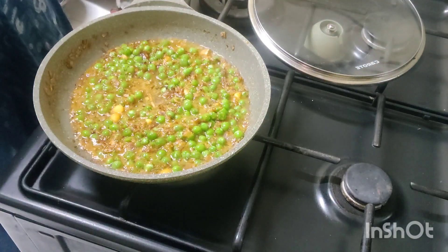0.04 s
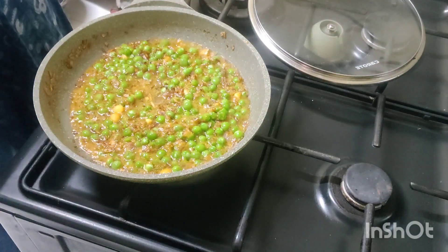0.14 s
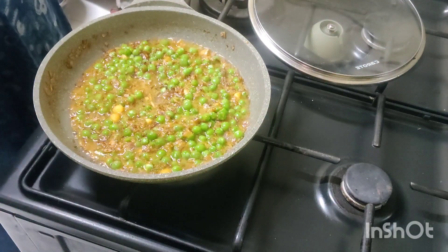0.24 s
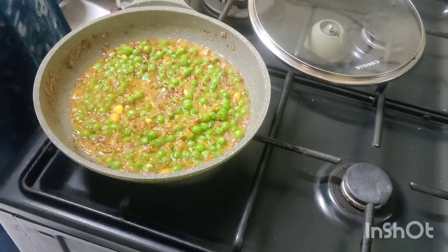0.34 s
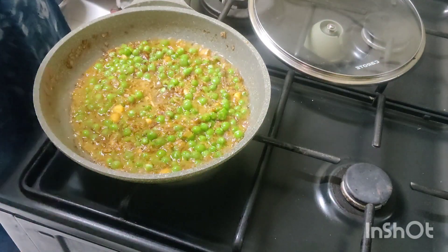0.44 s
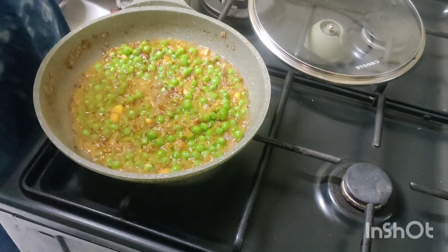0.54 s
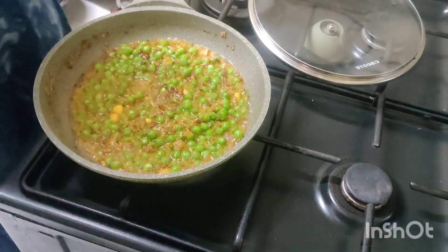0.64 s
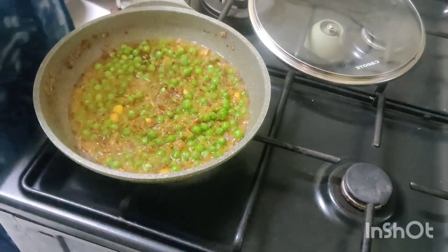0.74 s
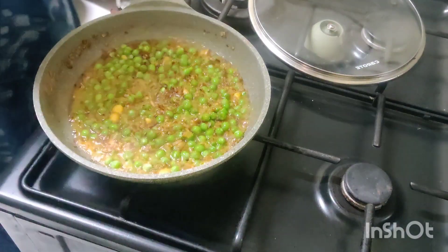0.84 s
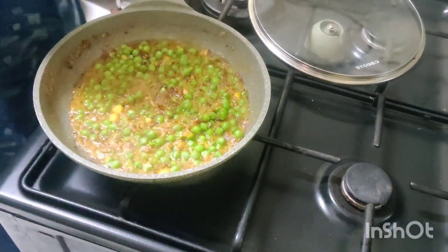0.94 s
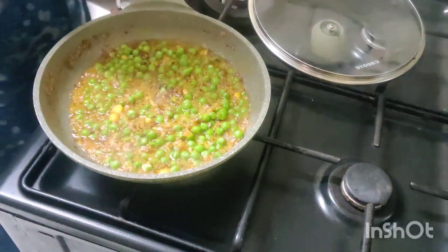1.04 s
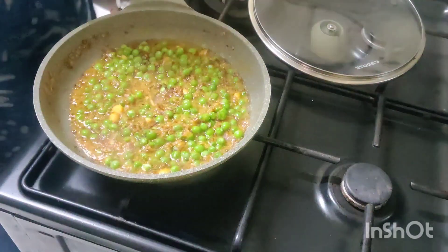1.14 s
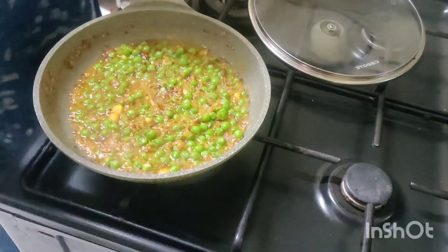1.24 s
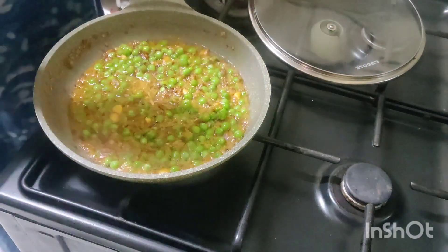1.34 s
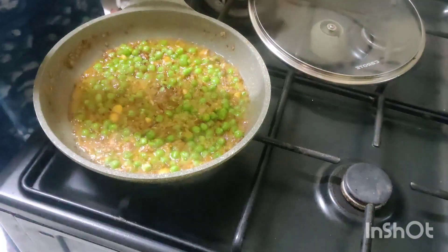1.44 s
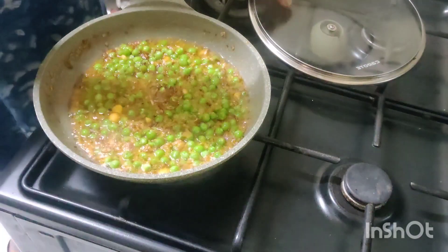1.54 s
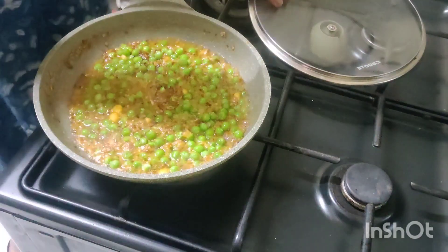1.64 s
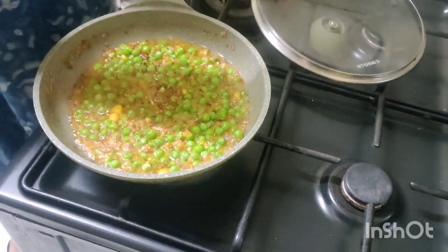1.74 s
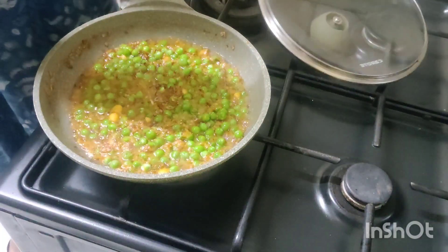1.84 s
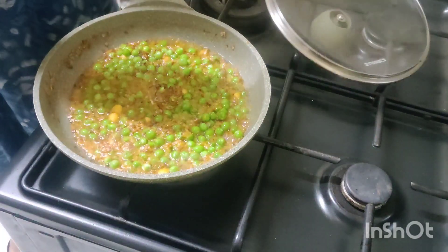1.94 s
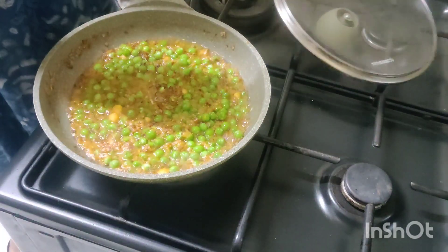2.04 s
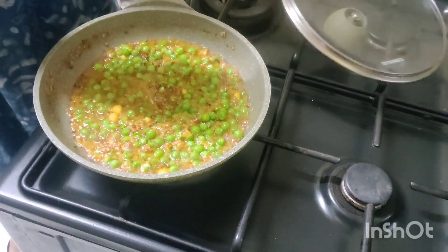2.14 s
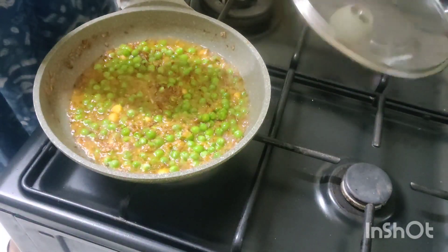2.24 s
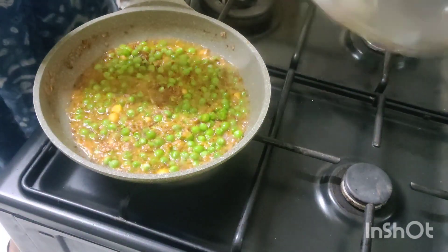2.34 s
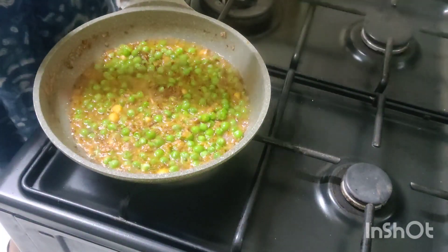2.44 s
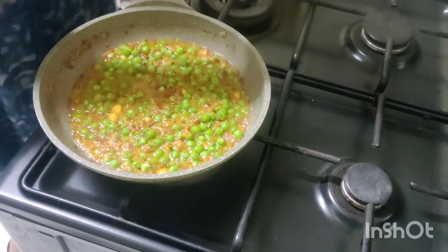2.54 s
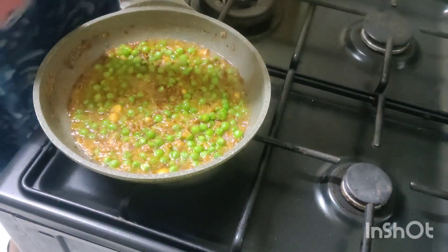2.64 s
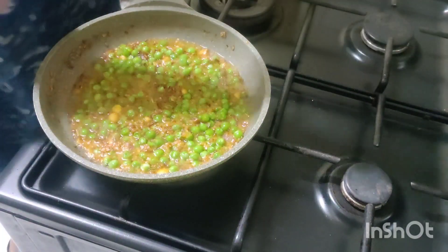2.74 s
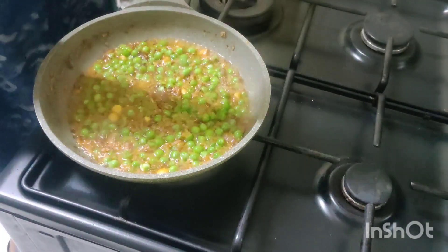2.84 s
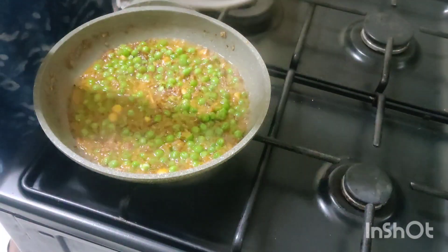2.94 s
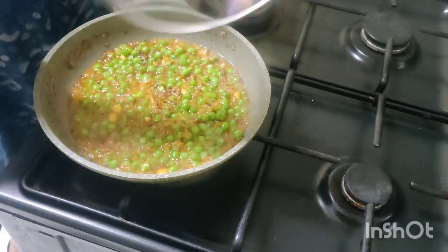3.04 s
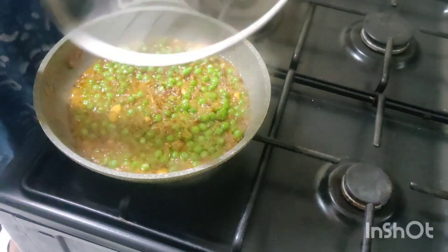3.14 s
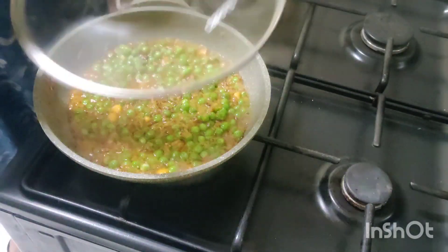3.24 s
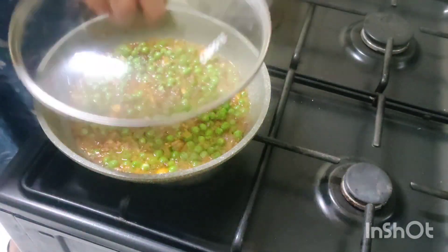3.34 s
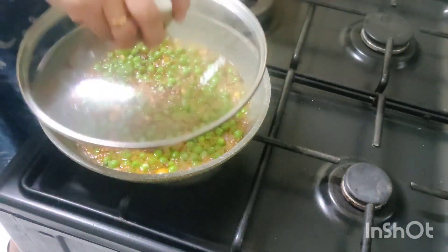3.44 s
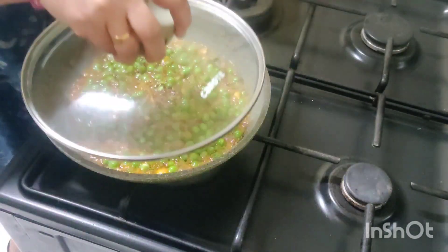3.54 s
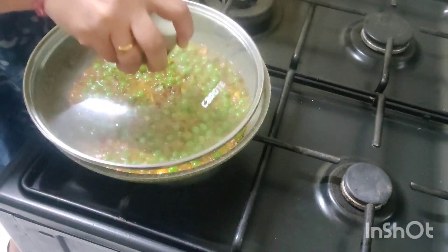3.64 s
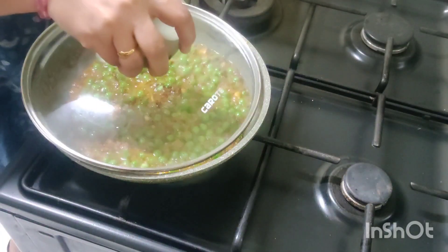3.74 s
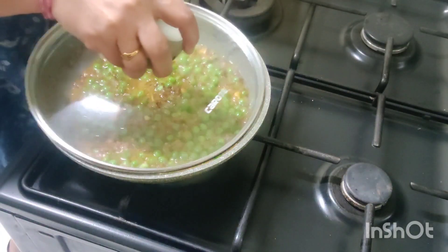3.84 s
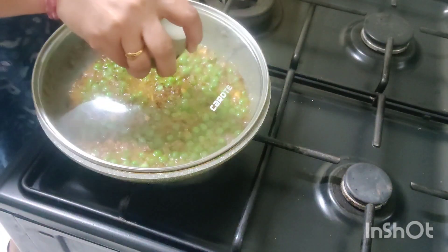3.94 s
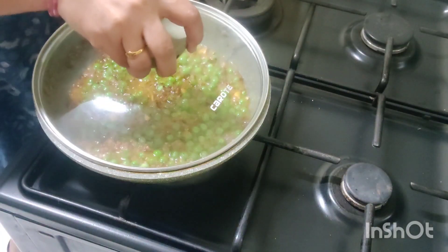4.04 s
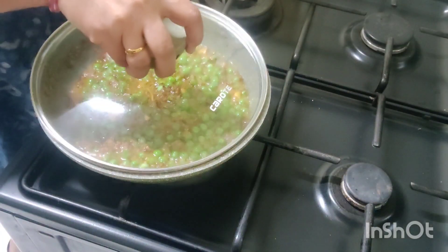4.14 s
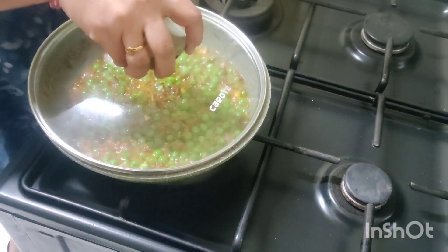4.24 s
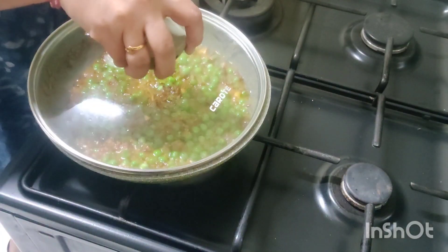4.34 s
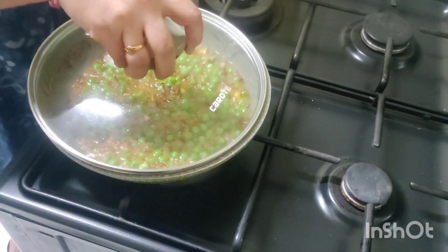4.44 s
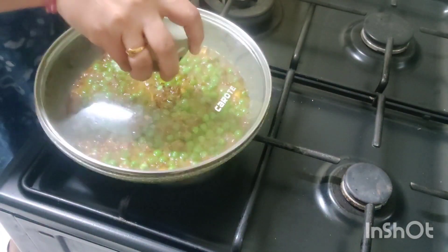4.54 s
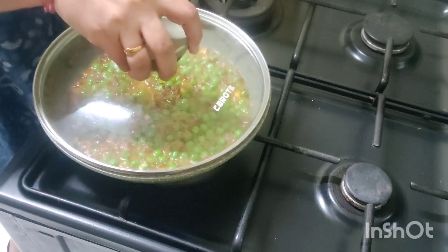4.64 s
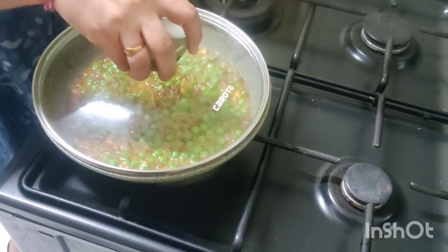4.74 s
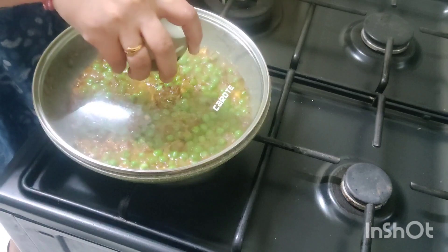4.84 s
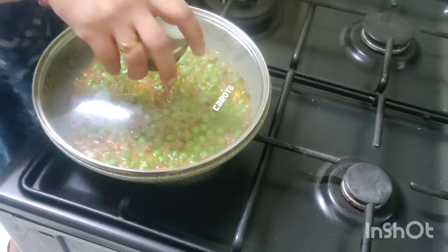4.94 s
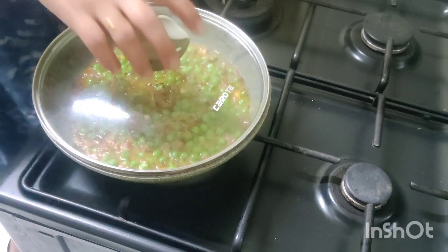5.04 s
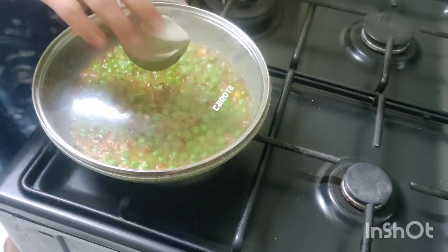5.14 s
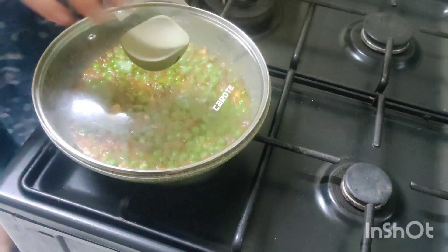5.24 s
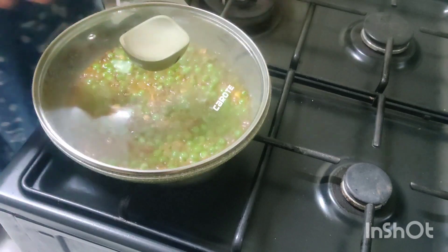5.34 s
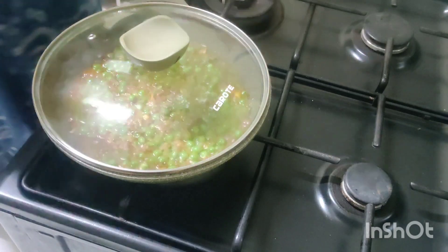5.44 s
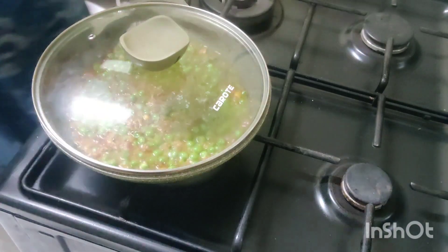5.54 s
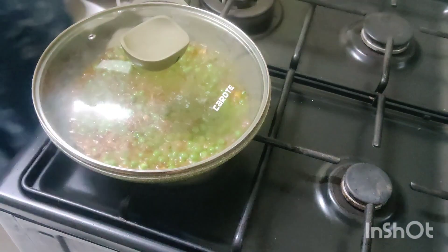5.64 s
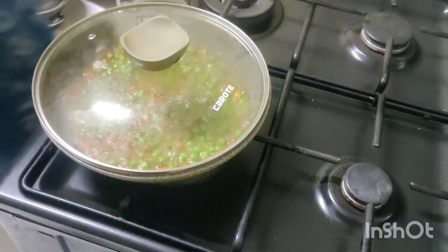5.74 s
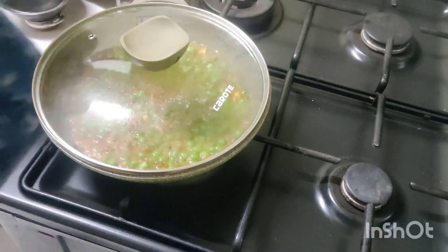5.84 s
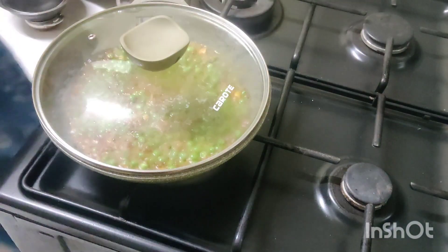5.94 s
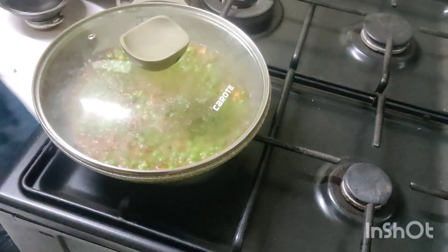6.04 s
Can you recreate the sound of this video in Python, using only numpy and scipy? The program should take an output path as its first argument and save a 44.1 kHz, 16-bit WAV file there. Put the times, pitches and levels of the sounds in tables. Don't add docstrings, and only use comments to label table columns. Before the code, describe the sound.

Peas simmer and faintly sizzle in a pan on a gas stove; a glass lid clatters, bounces on the rim and drops shut with a loud clunk.

```python
import sys
import numpy as np
from scipy import signal
from scipy.io import wavfile
from scipy.ndimage import uniform_filter1d

SR = 44100
rng = np.random.default_rng(int(sys.argv[2]) if len(sys.argv) > 2 else 0)


def put_to_file(sound):
    columns = np.atleast_2d(sound).T
    safe = np.clip(columns, -1, 1)
    whole_steps = np.round(safe * 32767)
    wavfile.write(sys.argv[1], SR, whole_steps.astype(np.int16))


def linear_from_db(decibels):
    return 10 ** (np.asarray(decibels, float) / 20)


N = 268423


REGISTER_HZ = (1000, 3000)


def blows(table, modes, rattle, ring_db, rattle_db, middle_db, middle_share, contact_cycles=2.08):
    start_s, thud_db, hard_db, rattle_t60_s = np.transpose(table)
    middle = thud_db + middle_db + middle_share * hard_db
    register_db = np.c_[thud_db, middle, thud_db + hard_db]
    at = np.round(start_s * SR).astype(int)
    span = slice(at.min(), min(at.max() + SR // 2, N))
    out = np.zeros(N)
    for hz, db, t60 in modes:
        luck = rng.standard_normal((len(at), 2))
        sign = np.sign(luck[:, 1]) if hz > 560 else -1
        mode_db = register_db[:, np.searchsorted(REGISTER_HZ, hz)] + db + ring_db + 2.0 * luck[:, 0]
        clicks = np.zeros(N)
        clicks[at] = linear_from_db(mode_db) * sign
        contact = ring(clicks[span], hz, contact_cycles / hz) * hz / SR * 8.84 / contact_cycles
        out[span] += ring(contact, hz, t60)
    t = np.arange(SR // 2) / SR
    onset = np.minimum(t / 0.0022, 1)
    for i, levels_db, t60 in zip(at, register_db, rattle_t60_s):
        for register, db in zip(rattle, levels_db):
            part = register[i:i + len(t)]
            fade = linear_from_db(db + rattle_db - 60 * t / max(t60, .01)) * onset
            out[i:i + len(t)] += part * fade[:len(part)]
    return out


def rattle_noise(slices, colour, thud_db):
    registers = np.zeros((3, N))
    for hz, part in slices:
        registers[np.searchsorted(REGISTER_HZ, hz)] += part * linear_from_db(at_hz(colour, hz))
    return [rms_one(r) * linear_from_db(db) for r, db in zip(registers, (thud_db, 0, 0))]


# start_s, thud_db, hardness_db, rattle_t60_s
LIFT_BLOWS = [(1.901, -36, -28, 0.1), (1.909, -19, -20, 0.15), (1.916, -20, -19, 0.1),
              (1.925, -23, -20, 0.08), (1.9285, -25, 5.5, 0.06), (1.931, -23.5, 10.5, 0.03),
              (1.94, -27.5, 4, 0.082), (1.955, -24, -23, 0.024), (1.968, -36, -2, 0.074),
              (1.983, -29.5, -14, 0.15), (1.998, -29.5, -14, 0.088), (2.012, -33.5, -6, 0.087)]
# pitch_hz, level_db, t60_s
GRATE_MODES = [(190.9, 1, 0.322), (259.7, -4.5, 0.23), (385, 7.5, 0.072), (511, -5.5, 0.18),
               (605, -9, 0.31), (717, 5, 0.028), (876, 0, 0.044), (1500, -2.5, 0.084), (1980, -0.5, 0.071),
               (2354, 5, 0.036), (2650, 4, 0.04), (2950, -1, 0.04), (3670, 3, 0.035), (3930, -0.5, 0.092),
               (4317, 7, 0.037), (4700, -4, 0.033), (4520, -18, 0.029), (5200, -26.5, 0.092),
               (5590, -5.5, 0.092), (5870, -5, 0.03), (7000, -15.5, 0.022), (7450, -10.5, 0.044)]
# pitch_hz, density_db
GRATE_COLOUR = [(53, -52), (90, -26.5), (238, 6), (335, -3), (745, -10), (1030, -41), (1360, -21),
                (2240, -33), (3160, -22), (3920, -10), (4660, -9), (5780, -16), (7000, -24.5), (15600, -43)]


def lid_lift(slices):
    rattle = rattle_noise(slices, GRATE_COLOUR, thud_db=-4.5)
    return blows(LIFT_BLOWS, GRATE_MODES, rattle, ring_db=-10.5, rattle_db=-10,
                 middle_db=-5.0, middle_share=0.15)


# start_s, thud_db, hardness_db, rattle_t60_s
BOUNCE_BLOWS = [
    (3.732, -13, -5, 0.032),
    (3.744, -15, -18.5, 0.22),
    (3.764, -18.5, -12.5, 0.051),
    (3.783, -24, -30, 0.12),
    (3.793, -23.5, -34, 0.1),
]
# pitch_hz, level_db, t60_s
RIM_MODES = [(170.5, -2.5, 0.15), (200, -1, 0.055), (394, -23, 0.26), (428, -7, 0.26), (467, -30, .12),
             (519, 3.5, 0.14), (565, -3, 0.11), (1176, -1.5, 0.22), (1784, 13.5, 0.021), (2030, 0, 0.066),
             (4190, -3, 0.071), (4480, -2, 0.024), (5150, -6, 0.037), (5460, -3.5, 0.038),
             (6200, -9, 0.027), (6400, -20, 0.033)]
# start_s, thud_db, hardness_db, rattle_t60_s
REBOUND_BLOWS = [
    (3.8165, -16, -11, 0.08),
    (3.825, -24, -33, 0.054),
    (3.833, -14, -40, 0.053),
    (3.844, -23.5, -18, 0.055),
    (3.862, -38, -26, 0.078),
    (3.914, -23.5, -18.5, 0.031),
    (3.923, -24.5, -30, 0.027),
    (3.953, -28, -27, 0.059),
]
# pitch_hz, level_db, t60_s
TILTED_MODES = [(183, -3, 0.056), (421.5, 4, 0.1), (523, -1.5, 0.099), (803, -23, 0.11), (950, -18, 0.11),
                (1180, -3, 0.12), (1810, 6, 0.037), (2000, 4, .04), (2330, 0.5, 0.064), (2790, -1, 0.036),
                (4400, 0, 0.039), (5150, -12, 0.037), (6340, 0.5, 0.033)]


def lid_bounce(rattle):
    first = blows(BOUNCE_BLOWS, RIM_MODES, rattle, ring_db=-11, rattle_db=-8,
                  middle_db=-4.0, middle_share=0.72)
    rebound = blows(REBOUND_BLOWS, TILTED_MODES, rattle, ring_db=-8.5, rattle_db=-11,
                    middle_db=-4.0, middle_share=0.72, contact_cycles=4.5)
    return first + rebound


# start_s, thud_db, hardness_db, rattle_t60_s
SETTLE_BLOWS = [(2.799, -36, -25, 0.16), (2.829, -45.5, 4.5, 0.1), (3.22, -53, -9, 0.073),
                (3.98, -26.5, -31, 0.2), (3.987, -23.5, -31, 0.2), (4.005, -32, -20, 0.08),
                (4.015, -32.5, -12.5, 0.09), (4.021, -27, -22, 0.1), (4.027, -25.5, -36, 0.074),
                (4.032, -27, -25, 0.081), (5.19, -48, -10, 0.2), (5.243, -38.5, -13, 0.28),
                (5.334, -42, -20, 0.15)]
# start_s, thud_db, hardness_db, rattle_t60_s
SLIDE_BLOWS = [
    (4.613, -43.5, -26.5, 0.097),
    (4.628, -34, -18, 0.18),
    (4.646, -32, -22, 0.12),
]
# pitch_hz, level_db, t60_s
ROCKING_MODES = [(189, 0.5, 0.058), (253, -5, 0.18), (300.3, -0.5, 0.11), (399.6, 3.5, 0.067),
                 (475.5, -18, 0.047), (1130, -7.5, 0.13), (1713, 2, 0.048)]
# start_s, thud_db, hardness_db, rattle_t60_s
NUDGE_BLOWS = [
    (4.2765, -24.5, -20, 0.069),
    (4.29, -24.5, -31, 0.1),
    (4.3, -33.5, -22, 0.08),
    (4.334, -40, -13, 0.12),
    (4.362, -40, -16, 0.1),
]
# pitch_hz, level_db, t60_s
NUDGED_MODES = [(193, -4, 0.079), (293, 0, 0.087), (366.4, 0.5, 0.09), (423, -4, 0.089), (633, -21, 0.11),
                (775, -27, 0.2), (910, -20.5, 0.058), (1106, -0.5, 0.1), (1790, 1, 0.038)]


def lid_settle(rattle):
    rocking = blows(SETTLE_BLOWS + SLIDE_BLOWS, ROCKING_MODES, rattle, ring_db=-7.5, rattle_db=-11.0,
                    middle_db=-6, middle_share=0.66, contact_cycles=4.0)
    nudge = blows(NUDGE_BLOWS, NUDGED_MODES, rattle, ring_db=-7.5, rattle_db=-12.5,
                  middle_db=-4.5, middle_share=0.72, contact_cycles=2.2)
    return rocking + nudge


# start_s, thud_db, hardness_db, rattle_t60_s
SHUT_BLOWS = [
    (4.657, -13, -4.5, 0.081),
    (4.6633, 1, -15, 0.09),
    (4.6681, -11.5, -22, 0.1),
    (4.6776, -13, -21, 0.27),
    (4.6895, -20.5, -17, 0.22),
    (4.6988, -16, -23, 0.47),
    (4.725, -16.5, -24, 0.19),
    (4.745, -32.5, -4.5, 0.3),
]
# pitch_hz, level_db, t60_s
SEATED_MODES = [(226, 1.5, 0.032), (198.7, -12.5, 0.14), (250.7, -5.5, 0.27), (301.4, -4, 0.19),
                (419.4, 3.5, 0.12), (474, -9, 0.31), (518.5, -0.5, .17), (598, -3.5, 0.16),
                (701, -6.5, .08), (738, -10.5, 0.17), (838, -19.5, 0.17), (954, -18.5, 0.25),
                (1114, -10, 0.12), (1170, -5, 0.141), (1305, -2, .12), (1400, -6, 0.083), (1687, -5, 0.15),
                (2040, -4.5, 0.12), (2328, -9.5, 0.26), (3140, 4.5, 0.0232), (3610, -1, 0.0392),
                (5700, -0.5, .04), (6430, -9.5, .04)]
# pitch_hz, density_db
SEATED_COLOUR = [(90, -36), (200, 1), (420, -5.5), (700, -10), (1000, -14), (1800, -22), (3000, -28),
                 (5600, -28), (7000, -47), (9000, -56), (15600, -55.5)]


def lid_shut(slices):
    rattle = rattle_noise(slices, SEATED_COLOUR, thud_db=-5.0)
    return blows(SHUT_BLOWS, SEATED_MODES, rattle, ring_db=-12.5, rattle_db=-11.5,
                 middle_db=-4.5, middle_share=0.37)


# pitch_hz, density_db
RIM_COLOUR = [(90, -16.5), (170, -2), (280, -26.5), (480, -22), (750, -26), (1150, -16.5), (1800, -13.5),
              (3000, -25), (4500, -16.5), (6300, -23), (9000, -37.5), (15600, -43)]


def lid_and_pan(slices):
    rim_rattle = rattle_noise(slices, RIM_COLOUR, thud_db=-9)
    lift, bounce = lid_lift(slices), lid_bounce(rim_rattle)
    settle, shut = lid_settle(rim_rattle), lid_shut(slices)
    to_walls = linear_from_db(-5.5) * lift + linear_from_db(-12.5) * bounce + linear_from_db(-10) * settle + linear_from_db(-10.0) * shut
    near = lift + bounce + settle + shut + kitchen(to_walls)
    near = signal.sosfilt(signal.butter(6, 128, "high", fs=SR, output="sos"), near)
    return near * linear_from_db(-7 * ramp(start_s=4.755, length_s=0.037))


# start_s, thud_db, hardness_db, rattle_t60_s
CLANK_BLOWS = [(.155, -49, -8, 0.35), (.172, -52, -13, 0.44), (.181, -54, -11, 0.28), (.19, -52, -20, 0.3),
               (.21, -50, -15, 0.19), (.244, -43, 6, 0.092), (.248, -36, -0.5, 0.14),
               (.253, -30, -16, 0.094), (.262, -32.5, -2, 0.079), (.27, -34, 1, 0.1), (.284, -40, 0, 0.14),
               (.299, -39, 2, 0.093), (.311, -39, -10, 0.079), (.324, -50, -6, 0.083),
               (.338, -48, -13, 0.1), (.349, -50, -2, 0.1)]
# pitch_hz, level_db, t60_s
POT_MODES = [(98, -2.5, 0.27), (310, -1, 0.2), (642, -3, 0.09), (698, 4.5, 0.18), (856, -22, .06),
             (1300, -10, .08), (1980, -2, 0.048), (3020, -15, 0.075), (5600, -23, .1), (5730, -3, 0.22),
             (7370, -14, 0.17), (9400, -28, .05), (10970, -15, .04)]
# pitch_hz, density_db
POT_COLOUR = [(53, -39), (90, -21), (495, -35), (690, 4), (925, -13), (1330, -6), (2840, -18), (4870, -33),
              (5780, -17.5), (15600, -62)]


def far_pot(slices):
    rattle = rattle_noise(slices, POT_COLOUR, thud_db=0.0)
    clank = blows(CLANK_BLOWS, POT_MODES, rattle, ring_db=-8.5, rattle_db=-12.0,
                  middle_db=0.5, middle_share=0.16)
    return clank + linear_from_db(-8.5) * kitchen(clank)


# start_s, peak_db, pitch_hz
FAT_SPITS = [(0.418, -29, 1900), (0.6145, -28, 5900), (0.7685, -34, 4900), (0.772, -39, 1100),
             (0.7755, -33, 4800), (0.9946, -38, 5000), (0.998, -41, 7500), (1.099, -42, 8500),
             (1.2391, -36, 6380), (1.2399, -41, 1720), (1.3823, -35, 6140), (1.8736, -49, 1970),
             (2.9272, -34, 5600), (3.0045, -38, 2000), (3.105, -40, 6300), (5.9294, -52, 1580),
             (5.99, -52, 6240), (6.02, -52, 1740), (6.03, -52, 5700),
             (0.1274, -50, 8460), (0.1585, -47, 8020), (0.1594, -47, 14000), (0.2254, -46, 9000),
              (0.3774, -45, 14000), (0.4694, -50, 7570), (0.5591, -45, 10500), (0.766, -43, 9500),
              (0.7665, -43, 13500), (1.2391, -45, 9300), (1.7848, -48, 8500), (2.0747, -41, 9000),
              (2.3067, -40, 7300), (2.3999, -46, 8500), (2.4289, -35, 8500), (3.0011, -47, 9000),
              (3.5603, -51, 8500)]


def spits():
    out, t = np.zeros(N), np.arange(300) / SR
    for start_s, db, hz in FAT_SPITS:
        wobble = .45 * np.cumsum(rng.standard_normal(300)) * hz / 9000
        burst = np.sin(2 * np.pi * hz * t + wobble) * linear_from_db(-60 * t / 0.007) * np.minimum(t * hz, 1)
        out[round(start_s * SR):][:300] += linear_from_db(db - 7.5) * burst
    return out


# pitch_hz, density_db
SIZZLE_OPEN_COLOUR = [(1650, -45.5), (2800, -7), (3840, -4.5), (6330, 2.5), (8000, -16.5), (8910, -9.5),
                      (12200, -19.5), (14800, -15.5), (15600, -20)]
# pitch_hz, density_db
SIZZLE_SHUT_COLOUR = [(1650, -46), (2800, -0.5), (2920, -9.5), (3300, -15.5), (4100, 6.5), (4440, -4),
                      (5960, 5), (8000, -14.5), (11500, -12.5), (14300, -11.5), (15600, -20)]


def sizzle(closed):
    pops = grains(160, 1.5)
    fizz = [grains(9800, 3) + 0.088 * pops, grains(9000, 1.6) + 0.38 * pops]
    return texture(fizz, SIZZLE_OPEN_COLOUR, SIZZLE_SHUT_COLOUR, closed, patchy_db=0.43)


# pitch_hz, density_db
SIMMER_OPEN_COLOUR = [(220, -14.5), (380, -10.5), (466, 3.5), (519, -6), (833, 0), (1050, -4), (2010, 2.5),
                      (2360, -7.5), (3200, -10), (4160, -24), (7040, -120)]
# pitch_hz, density_db
SIMMER_SHUT_COLOUR = [(220, -15.5), (380, 15), (394, -1.5), (722, -7.5), (886, -21.5), (1060, -9),
                      (1190, -14.5), (1650, -18), (3200, -25), (4160, -53.5), (7040, -120)]
# pitch_hz, width_hz, level_db (over simmer)
AIR_HOLLOWS = [(182, 28, -6), (358, 58, -14), (734, 27, -6), (1152, 60, -10.5), (1725, 25, -7),
               (4090, 180, -10)]


def simmer(closed):
    bubbles = [grains(4000, 2.0), grains(4000, 2.4)]
    out = texture(bubbles, SIMMER_OPEN_COLOUR, SIMMER_SHUT_COLOUR, closed, patchy_db=1.7)
    for hz, width_hz, db in AIR_HOLLOWS:
        hum = rms_one(ring(rng.standard_normal(N), hz, np.log(1000) / np.pi / width_hz))
        lid_db = 11.1 * (closed - 1) * (hz > 500)
        out = out + hum * linear_from_db(db + 0.5 * drift(1.2) + lid_db)
    return out


# pitch_hz, density_db
FLAME_COLOUR = [(59, -32), (100, -11), (183, 10), (269, -5), (300, -6), (322, 0), (355, -12.5),
                (420, -23.5), (550, -28.5), (920, -120)]


def flame(closed):
    return texture(rng.standard_normal((2, N)), FLAME_COLOUR, FLAME_COLOUR, closed, patchy_db=1.44)


# pitch_hz, density_db
DRONE_COLOUR = [(21, -24), (36, -10.5), (54, 4), (76, -0.5), (110, -2), (140, -0.5), (240, -120)]


def drone(closed):
    return texture(rng.standard_normal((2, N)), DRONE_COLOUR, DRONE_COLOUR, closed, patchy_db=1.5)


# start_s, length_s, cover_share (0-1)
COVER_MOVES = [
    (3.064, 0.52, 0.21),
    (3.75, 0.38, 0.75),
    (4.66, 0.1, 0.46),
]


def lid_cover():
    cover = sum(share * ramp(start_s, length_s) for start_s, length_s, share in COVER_MOVES)
    hover = ramp(start_s=2.55, length_s=0.98)
    closed = 0.28 + (0.6 - 0.28) * (0.22 * hover + (1 - 0.22) * cover)
    return cover, closed


# start_s, swell_db
SUPPRESSION_SWELLS = [
    (-0.5, 4.5),
    (0.27, 6),
    (1.95, 12),
    (2.8, -0.5),
    (3.78, 9),
    (4.29, -0.5),
    (4.68, 11),
    (5.2, 1.5),
    (5.4, -2.5),
    (5.979, 3),
]


def swell():
    out, quick_share = 0, 0.47
    for start_s, db in SUPPRESSION_SWELLS:
        t = np.maximum(np.arange(N) / SR - start_s, 0)
        sinking = quick_share * np.exp(-t / 0.28) + (1 - quick_share) * np.exp(-t / 1.32)
        out = out + db * ramp(start_s, length_s=0.03) * sinking
    return out


def background():
    cover, closed = lid_cover()
    swell_db = swell()

    def level(settled_db, follows, lid_loss_db):
        return linear_from_db(settled_db + follows * swell_db - lid_loss_db * cover)

    out = level(-58.5, follows=0.87, lid_loss_db=12.83) * sizzle(closed)
    out += level(-60.5, follows=0.93, lid_loss_db=7.0) * simmer(closed)
    out += level(-65, follows=1.44, lid_loss_db=3.7) * flame(closed)
    out += level(-68.5, follows=1, lid_loss_db=4.1) * drone(closed)
    return out


def kitchen(x):
    t60_s, first_echo_s = 0.22, 0.0096
    t = np.arange(SR // 2) / SR
    echoes = rng.standard_normal(len(t)) * linear_from_db(-60 * t / t60_s) * np.clip(t / first_echo_s - 1, 0, 1)
    return signal.fftconvolve(x, echoes / np.sqrt(np.sum(echoes ** 2)))[:N]


def texture(sources, opened, shut, closed, patchy_db):
    out, together = 0, drift(4.4)
    for hz, part in bands(sources, opened[0][0], opened[-1][0]):
        colour_db = (1 - closed) * at_hz(opened, hz) + closed * at_hz(shut, hz)
        flicker_db = patchy_db * (.8 * together + drift(14))
        out = out + part * linear_from_db(colour_db + flicker_db)
    return out / np.sqrt(uniform_filter1d(out ** 2, size=30000) + 1e-20)


def bands(sources, low_hz, high_hz):
    count = round(3 * np.log2(high_hz / low_hz))
    edges = np.geomspace(low_hz, high_hz, count + 1)
    for k, (low, high) in enumerate(zip(edges, edges[1:])):
        band = signal.butter(2, (low, high), "band", fs=SR, output="sos")
        yield np.sqrt(low * high), signal.sosfilt(band, sources[k % 2])


def grains(per_s, spread_db):
    sizes = linear_from_db(spread_db * np.minimum(rng.exponential(1, N), 3.6)) * rng.choice([-1, 1], N)
    return rms_one(sizes * (rng.random(N) < per_s / SR))


def ring(clicks, hz, t60):
    r, w = linear_from_db(-60 / (t60 * SR)), 2 * np.pi * hz / SR
    return signal.lfilter([0, np.sin(w)], [1, -2 * r * np.cos(w), r * r], clicks + 1e-18)


def drift(rate_hz):
    r = np.exp(-80 * np.pi * rate_hz / SR)
    noise = rng.standard_normal(N // 40 + 2002)
    slow = signal.lfilter([1], [1, -2 * r, r * r], noise)[2000:]
    return np.interp(np.arange(N) / 40, np.arange(len(slow)), rms_one(slow))


def ramp(start_s, length_s):
    return np.clip((np.arange(N) / SR - start_s) / length_s, 0, 1)


def at_hz(points, hz):
    points_hz, points_db = np.transpose(points)
    return np.interp(np.log(hz), np.log(points_hz), points_db)


def rms_one(x):
    return x / np.sqrt(np.mean(x ** 2) + 1e-20)


def scene():
    slices = list(bands([grains(6000, 3.5), grains(6000, 3.5)], 90, 15600))
    return (lid_and_pan(slices) + far_pot(slices) + spits() + background())[None]


def top_cut(x):
    return signal.sosfilt(signal.butter(12, 16060, fs=SR, output="sos"), x)


def record(dry):
    mix = signal.sosfilt(signal.cheby2(24, 70, 15750, fs=SR, output="sos"), dry)
    return top_cut(mix)


dry = scene()
out = record(dry)
put_to_file(out)
```